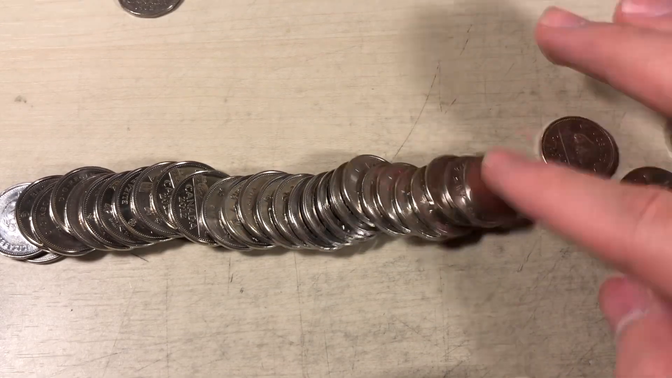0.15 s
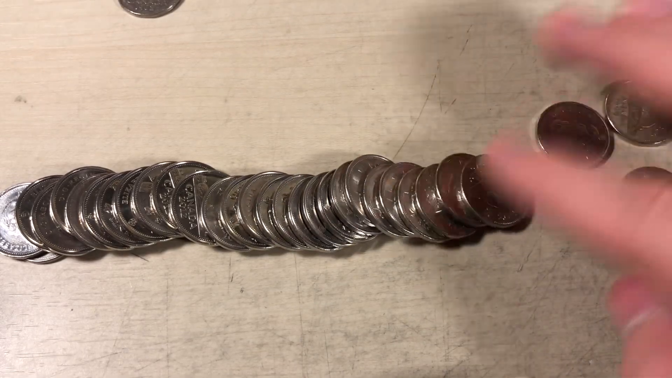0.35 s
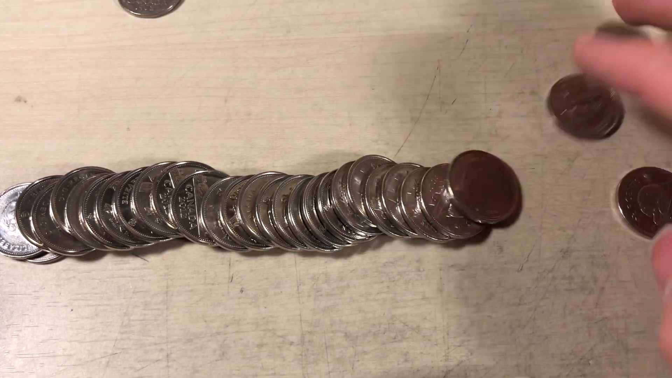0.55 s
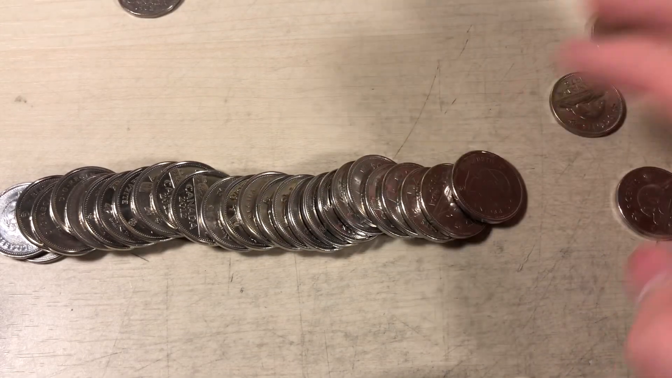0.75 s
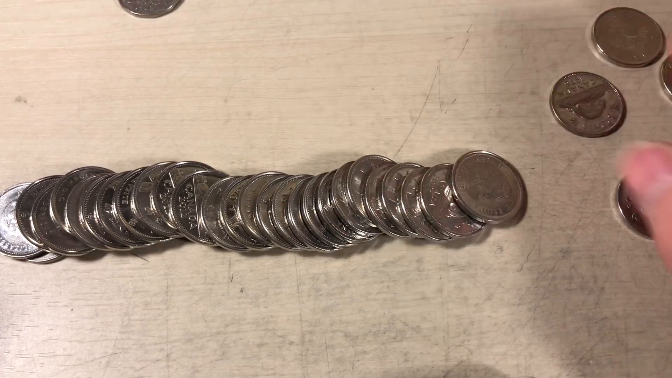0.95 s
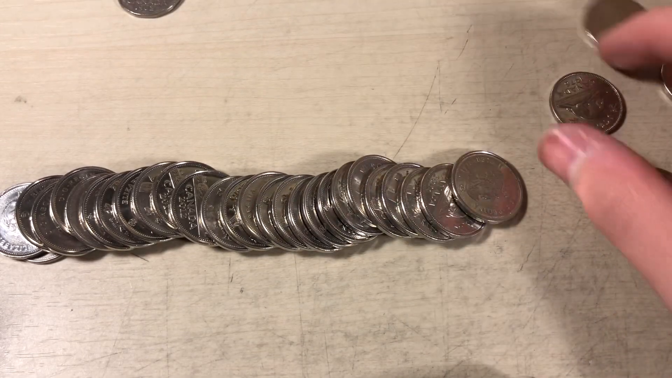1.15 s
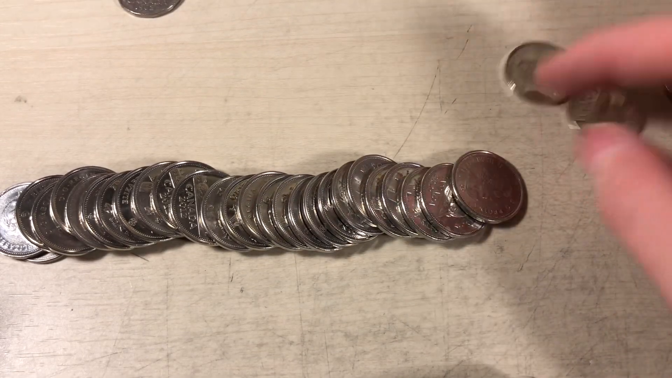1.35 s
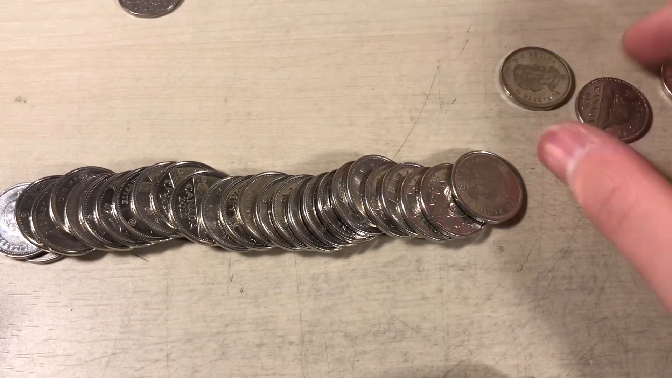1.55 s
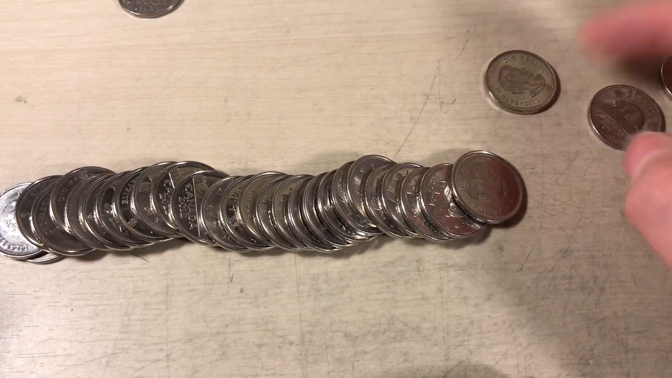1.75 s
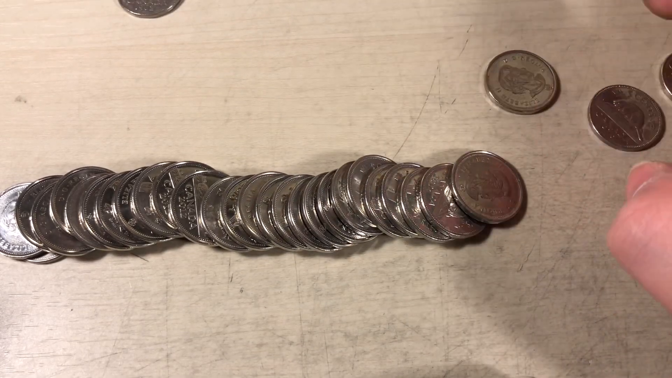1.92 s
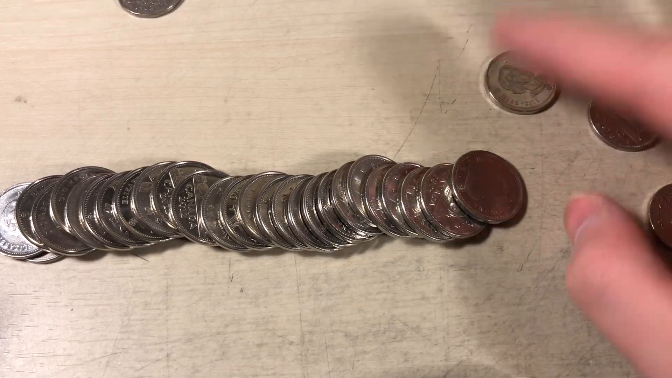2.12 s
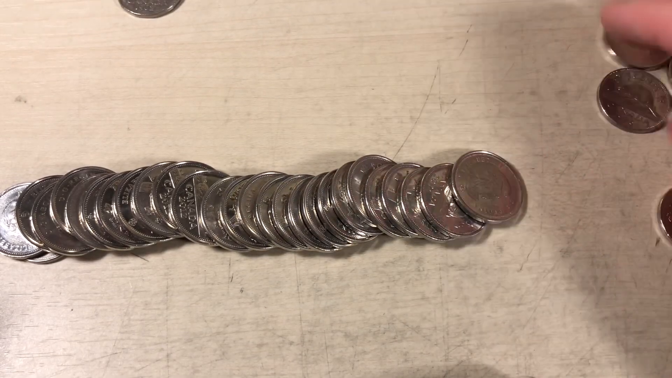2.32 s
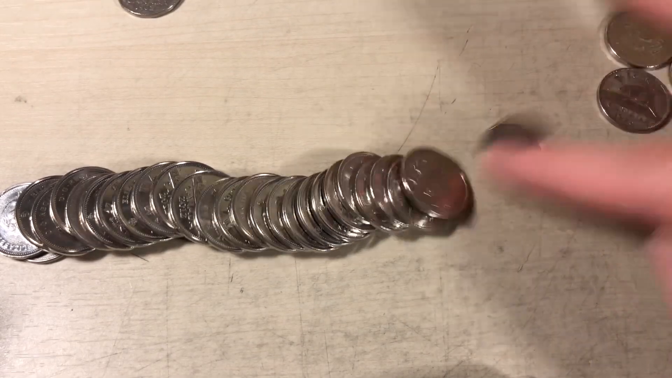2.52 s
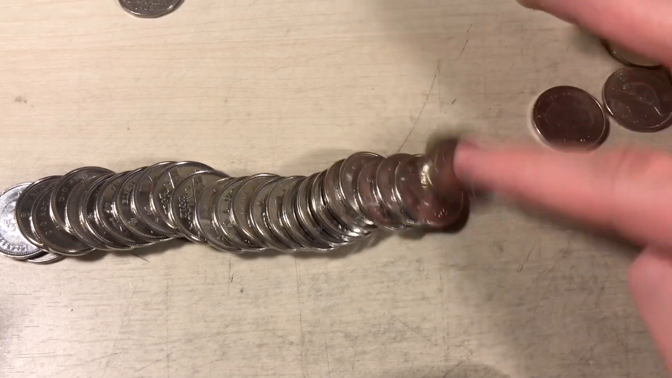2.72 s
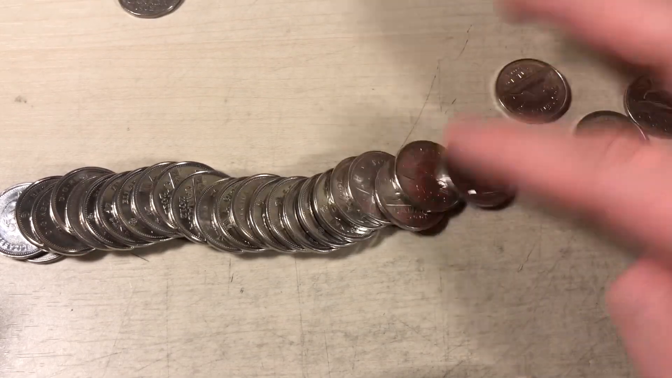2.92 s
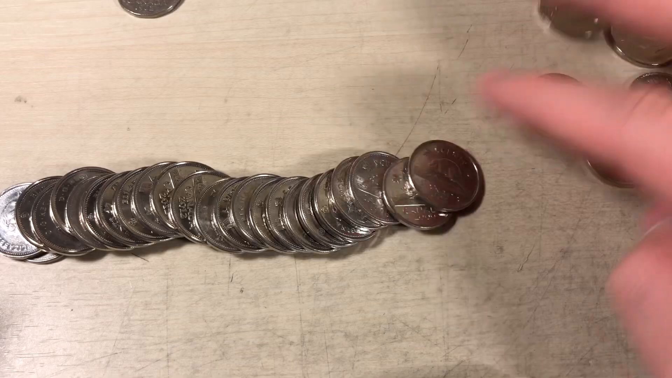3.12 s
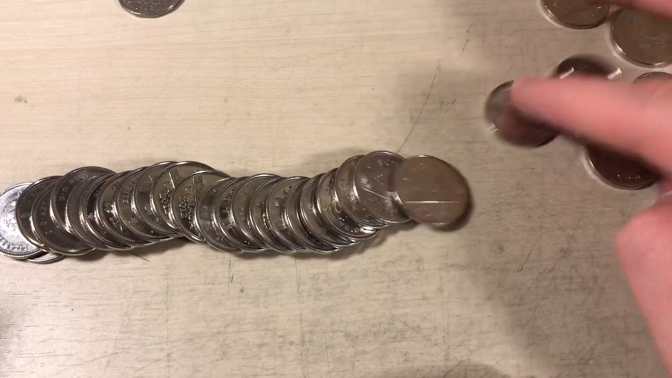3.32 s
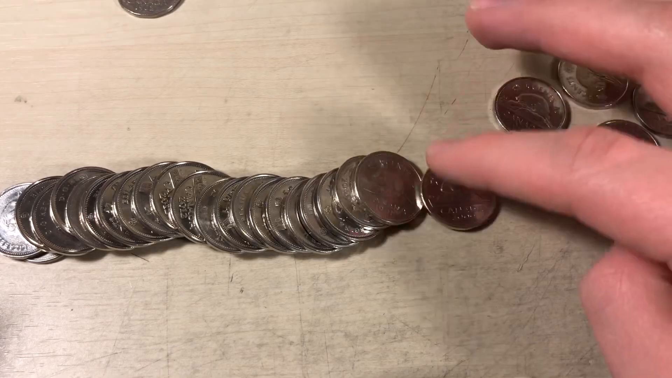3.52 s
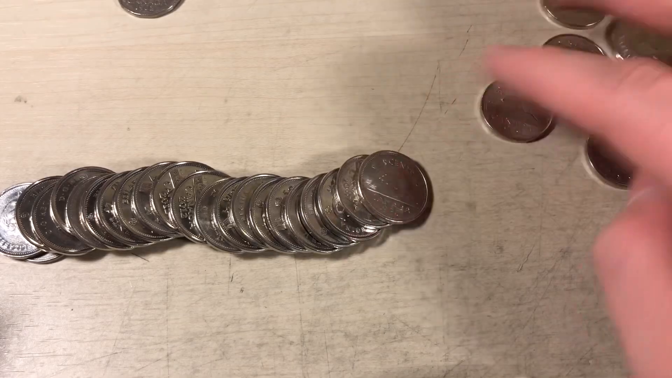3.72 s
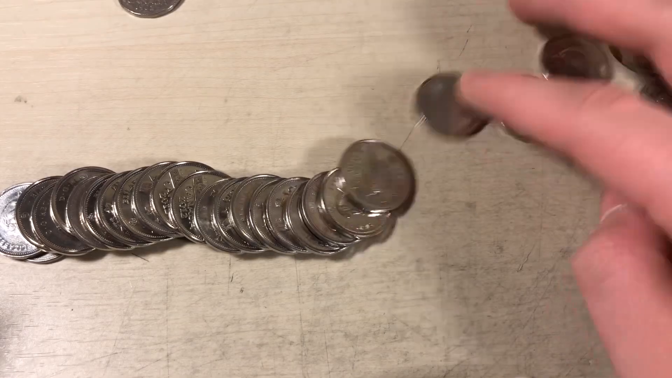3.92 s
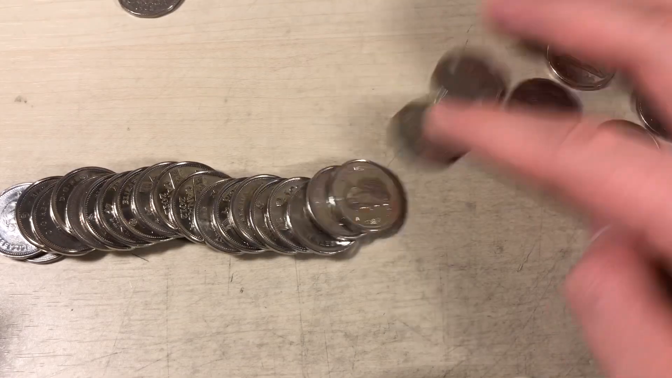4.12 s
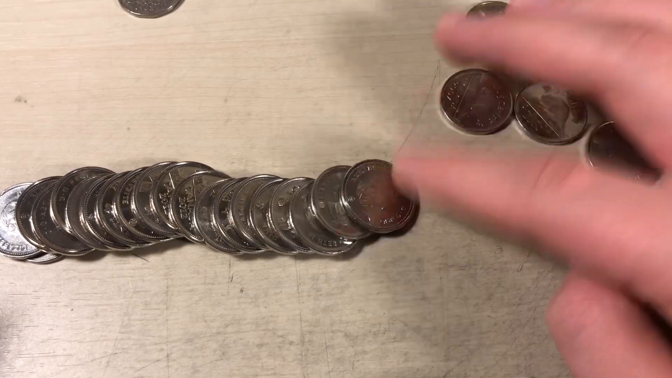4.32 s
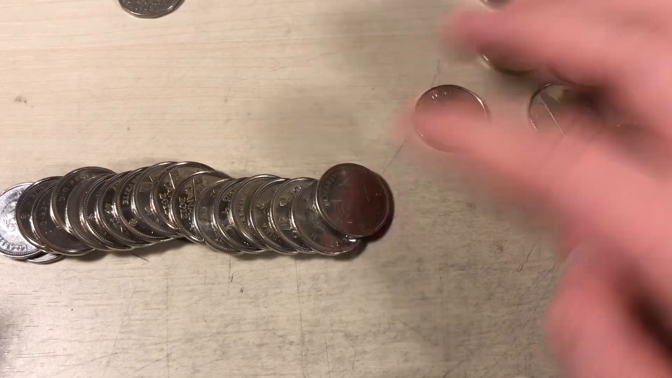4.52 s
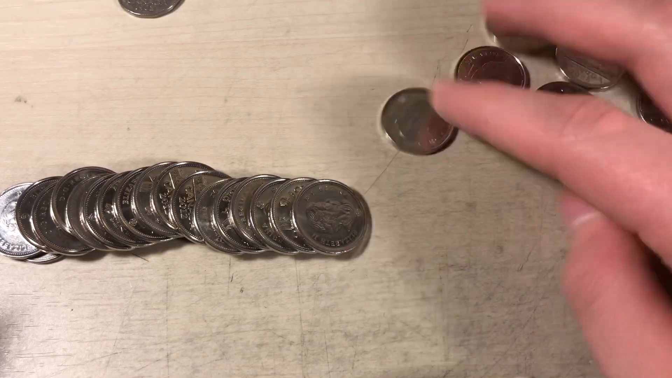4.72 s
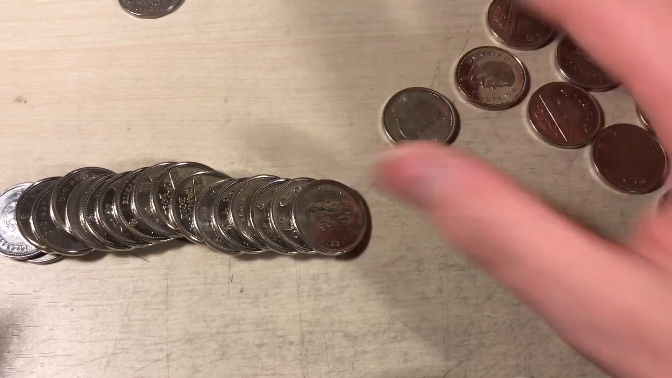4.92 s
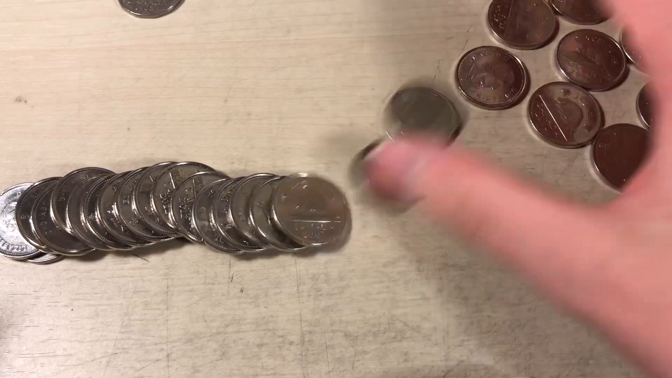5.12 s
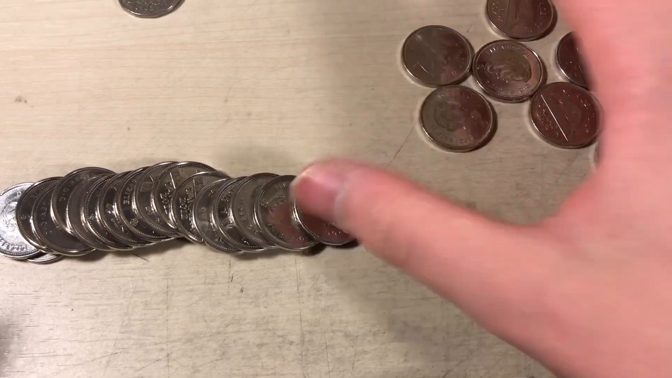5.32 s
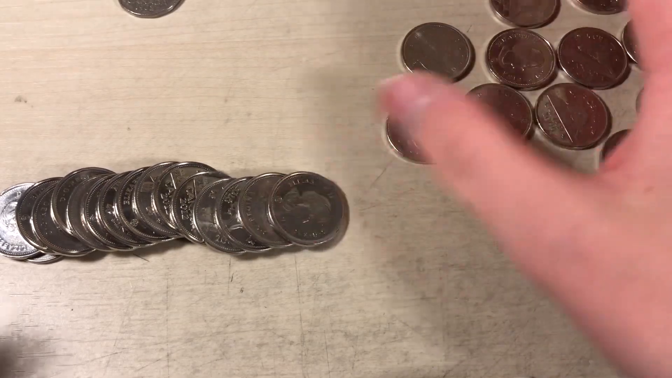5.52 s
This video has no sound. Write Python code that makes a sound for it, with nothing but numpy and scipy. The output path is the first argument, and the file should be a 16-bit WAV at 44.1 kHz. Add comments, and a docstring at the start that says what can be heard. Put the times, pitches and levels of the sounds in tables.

```python
"""Small coins are flicked one by one off a leaning row and slide across a wooden table, close to a camera.
Each coin is lumpy noise for its scrape and rim chatter, and bursts of noise and ringing modes for its clinks.
The table top knocks and shakes as a set of damped modes; now and then a fingertip taps it or skin brushes it.
A small room answers with short tails of noise, over a steady hush of air and microphone hiss."""
import sys
import numpy as np
from scipy import signal
from scipy.fft import rfft, irfft, next_fast_len
from scipy.io import wavfile
from scipy.ndimage import map_coordinates

SR = 44100
rng = np.random.default_rng(int(sys.argv[2]) if len(sys.argv) > 2 else 0)


def magnitude_from_level(level_db):
    """Linear magnitude for a level in decibels (20 dB per decade)."""
    exponent = np.asarray(level_db, float) / 20
    return 10 ** exponent


def to_wav(s):
    """Save 16-bit WAV."""
    ch = np.atleast_2d(s).T  # columns
    pcm = np.round(np.clip(ch, -1, 1) * 32767)  # PCM
    wavfile.write(sys.argv[1], SR, pcm.astype(np.int16))


N = 245195


def unit(x):
    """Scale to rms 1."""
    return x / np.sqrt(np.mean(x ** 2) + 1e-20)


def along(points, hz):
    """Interpolate (Hz, value) points on a log frequency axis."""
    f, v = np.transpose(points)
    return np.interp(np.log(hz + 1), np.log(f + 1), v)


def filtered(x, response):
    """x times a complex response of frequency."""
    m = next_fast_len(len(x) + 8192)
    return irfft(rfft(x, m) * response(np.fft.rfftfreq(m, 1 / SR)), m)[:len(x)]


def coloured(x, spectrum):
    """Causal colouring: the minimum-phase filter with this spectrum, at unit energy."""
    cepstrum = irfft(np.log(magnitude_from_level(along(spectrum, np.fft.rfftfreq(2048, 1 / SR)))))
    # folding the cepstrum onto positive time makes the filter minimum-phase
    cepstrum[1:1024] *= 2
    cepstrum[1025:] = 0
    kernel = irfft(np.exp(rfft(cepstrum)))
    return signal.fftconvolve(x, kernel / np.linalg.norm(kernel))[:len(x)]


def resonant(x, peaks):
    """x through a set of damped resonances, summed with alternating signs."""
    def response(f):
        total = 0
        for k, (hz, width, db) in enumerate(peaks):
            damping = 1j * f * width
            total = total + (-1) ** k * magnitude_from_level(db) * damping / (hz * hz - f * f + damping)
        return total
    return filtered(x, response)


def wobble(rate):
    """A smooth random curve, rate knots a second."""
    knots = rng.standard_normal(int(N * rate / SR) + 4)
    return map_coordinates(knots, [np.arange(N) * rate / SR])


def grit(rate, spread_db, ms):
    """Noise of rms 1 in lumps: rate random bumps a second, a few large, each dying in ms."""
    bumps = (rng.random(N) < rate / SR) * magnitude_from_level(spread_db * rng.exponential(size=N))
    lumps = signal.lfilter([1], [1, -np.exp(-1000 / (ms * SR))], bumps)
    return unit(lumps * rng.standard_normal(N))


# Tone of the quiet bed. Each row: frequency in Hz, relative level per Hz in dB.
HUSH_TONE = [(13, -30), (22, -11.5), (48, -3), (90, -8.5), (128, -5), (200, -13.5), (328, -12), (1130, -27),
             (14700, -37.5), (16000, -50.5)]


def hush():
    """The steady air of the room and the microphone's hiss: shaped noise."""
    return magnitude_from_level(-67.5) * unit(filtered(rng.standard_normal(N), lambda hz: magnitude_from_level(along(HUSH_TONE, hz))))


def strokes(rows, t):
    """Gain of strokes that close contact in 14 ms, climb to a peak and die away ever faster."""
    s, rise, fade, first_db, peak_db = np.transpose(rows)[:, :, None]
    ms = (t - s) * 1000
    climb_db = (peak_db - first_db) * np.clip(ms / rise, 0, 1)
    fade_db = 30 * (np.maximum(ms - rise, 0) / fade) ** 1.2  # the power steepens the fade
    return np.sum(magnitude_from_level(first_db + climb_db - fade_db) * np.clip(ms / 14, 0, 1), axis=0)


# A coin drawn off the row scrapes ever harder, drops and slows. Each row: touch in seconds,
# ride in ms, time to fade by 30 dB in ms, first touch in dB, scrape at the drop in dB.
FLICKS = [(0.002, 56, 142, -33, -30.5), (0.245, 77, 121, -37, -33.5), (0.49, 63, 138, -52, -27),
          (2.561, 26, 185.5, -16.5, -34.5), (2.816, 41, 214, -40, -31), (3.04, 51, 104, -49.5, -31.5),
          (3.305, 47, 164, -34.5, -32), (3.66, 16, 169, -55, -32), (3.906, 57, 145, -40, -32.5),
          (4.178, 45, 122.5, -26.5, -35.5), (4.45, 45, 130, -38.5, -32), (4.69, 42, 110.5, -59.5, -37.5),
          (5.135, 61, 164.5, -66.5, -31.5), (5.445, 49, 111.5, -54.5, -33.5)]
# Its milled rim chatters over the neighbours. Each row: start in seconds, build-up in ms,
# time to fade by 30 dB in ms, relative first touch in dB, relative peak in dB.
CHATTERS = [(0.004, 58, 94, -35.5, -27.5), (0.246, 114, 67, -35.5, -34), (0.49, 59, 101, -56, -29.5),
            (2.561, 36, 89, -25, -27.5), (2.816, 112, 104, -32.5, -30.5), (3.03, 53, 106, -48, -30.5),
            (3.305, 56, 140, -30, -30), (3.665, 51, 74, -47, -32.5), (3.906, 42, 138.5, -36, -27),
            (4.179, 40, 59, -25.5, -26.5), (4.445, 56, 92.5, -46.5, -38.5), (4.7, 67, 60, -42, -46),
            (5.15, 55.6, 86.5, -60, -28.5), (5.447, 34, 137.5, -63.5, -30.5)]
# A coin glides or is pushed flat over the wood. Each row: start in seconds, time to reach speed in ms,
# length to the middle of its stop in ms, scrape in dB.
GLIDES = [(0.611, 48, 77, -51), (1.214, 16, 340, -48), (1.68, 55, 152, -51.5), (2.233, 48.5, 169, -39),
          (3.13, 40, 141, -50), (3.76, 19, 87, -50), (4.78, 10, 91, -50)]


def contact_db(t):
    """Levels of the scrape on the wood and of the chatter of coin on coin at times t."""
    stop_ms, glide_chatter_db = 97, -26  # a gliding rim chatters this far under its scrape
    s, rise, length, db = np.transpose(GLIDES)[:, :, None]
    ms = (t - s) * 1000
    speed = np.clip(ms / rise, 0, 1) * np.clip((length - ms) / stop_ms + .5, 0, 1)
    glide = np.sum(magnitude_from_level(db) * speed ** 2, axis=0)
    wood = strokes(FLICKS, t) + glide
    rim = strokes(CHATTERS, t) + magnitude_from_level(glide_chatter_db) * glide
    return 20 * np.log10([wood + 1e-5, rim + 1e-5])


# Modes of a coin lying on wood. Each row: frequency in Hz, width in Hz, relative level in dB.
COIN_ON_WOOD = [(1273, 23, -15), (1766, 18, -11), (1939, 37, -8.5), (2483, 29, -4.5), (2863, 23, -4),
                (3158, 53, 1), (3725, 99, 1), (4260, 130, -2.5), (5430, 80, -19), (5870, 73, -7),
                (5960, 200, -15), (8080, 150, -10.5)]


def grounded(x, rate, depth_db):
    """The coin-on-wood resonances come and go in groups, a little detuned, as coins and places change."""
    out = np.zeros(N)
    for tune in (.972, 1, 1.028):
        for k in range(4):
            modes = [(hz * tune, width, db) for hz, width, db in COIN_ON_WOOD[k::4]]
            out += resonant(magnitude_from_level(depth_db * wobble(rate)) * x, modes)
    return out


# Modes of the table top. Each row: frequency in Hz, width in Hz, relative level in dB.
TABLE_MODES = [(190.6, 32.5, -4), (250, 70, -2.5), (322.3, 87, -5.5), (415.7, 50, -7.5), (530.7, 36, 0.5),
               (586, 25, -3.5), (651, 33, -6.5), (1015, 60, -11)]


def table(x):
    """The low and the woody modes of the top trade places as the point of contact moves."""
    groups = (TABLE_MODES[:3], TABLE_MODES[3:])
    return sum(resonant(magnitude_from_level(2.5 * wobble(5)) * x, group) for group in groups)


# Bending modes of a free coin. Each row: frequency in Hz, relative level in dB, 60 dB decay in seconds.
COIN_MODES = [(12500, -6, 0.025), (15680, 3.5, 0.032), (15560, -6, .03), (16250, 1, 0.075)]


def ring(t, spread_db):
    """A coin's bending modes; every contact rings them at slightly different pitches and levels."""
    hz, db, t60 = np.transpose(COIN_MODES)[:, :, None]
    draw = rng.standard_normal((2, len(COIN_MODES), 1))
    fade = magnitude_from_level(db + spread_db * draw[0] - 60 * t / t60)
    tuned_hz = hz * (1 + 0.0018 * draw[1])
    return np.sum(fade * np.sin(2 * np.pi * tuned_hz * t), axis=0)


# Tone of coin rasping on wood. Each row: frequency in Hz, relative level per Hz in dB.
RASP_TONE = [(410, -42.5), (700, -5.5), (886, -10.5), (1310, 0), (2160, -1.5), (4490, -4), (5400, -14),
             (6500, -12.5), (9000, -27.5), (16000, -36)]
# Tone of bright metal ticks. Each row: frequency in Hz, relative level per Hz in dB.
TICK_TONE = [(1500, -30.5), (4000, 7.5), (8000, 7), (12000, -1), (16500, -2)]
# Each kind of rim tooth ticks in its own register.
# Each row: frequency in Hz, width in Hz, relative level in dB.
RIM_TEETH = [(5500, 1200, -19), (9000, 1700, 3.5), (11700, 1500, 12.5), (14700, 3000, 0)]


def sliding():
    """Wood grain rasps the coin; milled rims chatter and keep the coin ringing; the drag shakes the table."""
    t = np.arange(N) / SR
    wood_db, rim_db = contact_db(t)

    rasp = coloured(grit(rate=1900, spread_db=2.2, ms=.9), RASP_TONE)
    body = unit(grounded(rasp, 6, 3.5))
    scrape = unit(magnitude_from_level(1.2 * wobble(35)) * (0.7 * rasp + 0.9 * body))

    teeth = 0
    for rim in RIM_TEETH:
        ticking = magnitude_from_level(2.5 * wobble(30)) * grit(rate=280, spread_db=2.4, ms=.8)
        teeth = teeth + resonant(ticking, [rim])
    # harder chatter carries more plain noise between the teeth
    fizz = .4 * magnitude_from_level(.3 * np.minimum(rim_db + 33, 0)) * rng.standard_normal(N)
    chatter = magnitude_from_level(rim_db) * (unit(teeth) + fizz)

    # only a coin tossed clear of the wood rings, in fits
    free = magnitude_from_level(.7 * np.minimum(rim_db + 30, 0) + 5.5 * wobble(30))
    # decay times become resonance widths
    modes = [(hz, np.log(1000) / (np.pi * t60), db) for hz, db, t60 in COIN_MODES[1:]]
    ringing = resonant(free * chatter, modes)

    shake = unit(table(grit(rate=500, spread_db=2, ms=1.5)))
    # a coin riding over the row presses the table harder
    drag = magnitude_from_level(wood_db - 19.5) + magnitude_from_level(-22.5) * strokes(FLICKS, t) + magnitude_from_level(rim_db - 9.5)
    bright = magnitude_from_level(-2.5) * coloured(chatter, TICK_TONE)
    return magnitude_from_level(wood_db) * scrape + bright + magnitude_from_level(12.5) * ringing + drag * shake


# Contacts of the coins. Each row: start in seconds, relative crack level in dB,
# relative level of bright tick and ring in dB, time to fade by 20 dB in ms (at least 1 is used).
CLINKS = [(0.0135, -13.5, -32, 0.77), (0.033, -15.5, -28, 4.1), (0.044, -10, -28, 3),
          (0.085, -4.5, -9, 8.1), (0.246, -13, -51.5, 2.45), (0.266, -25.5, -31.5, 1.4),
          (0.298, -17.5, -25.5, 11), (0.3266, -6.5, -12, 8.8), (0.3452, -15, -13, 1.9),
          (0.4921, -24, -42.5, 6.1), (0.5683, -13.5, -17.5, 32), (0.5761, -17, -16.5, 4.1),
          (0.5907, -12, -30, 7.8), (0.632, -23.5, -43, 8.4), (1.3076, -34, -67, 2.8),
          (1.354, -23.5, -64.5, 0.93), (1.403, -39.5, -37, 8), (1.677, -26.5, -58, 1.46),
          (2.348, -23.5, -31, 7.7), (2.359, -35.5, -31, 4.4), (2.4029, -29.5, -68, 7.1),
          (2.4304, -29, -41, 3.8), (2.564, -13, -13, 12.7), (2.5931, -7, -16.5, 10.5),
          (2.6017, -18, -48, 30), (2.6113, -2, -5.5, 6.9), (2.6374, -7, -20.5, 6.8), (2.668, -18, -35, 3.6),
          (2.69, -19, -28, 2.8), (2.717, -49, -45, 3), (2.773, -53, -55.5, 4.7), (2.8172, -26, -58, 0.86),
          (2.8586, -2.5, -15.5, 13.5), (2.876, -17, -23, 4.8), (2.887, -12.5, -24, 3.8),
          (2.9005, -7.5, -13.5, 5.8), (2.9229, -19, -20, 1), (2.9278, -12, -24, 3.9),
          (2.978, -21, -37, 1.5), (3.055, -34, -51.5, 5.4), (3.0731, -28, -23.5, 7.2),
          (3.097, -2.5, -6, 11.2), (3.3084, -10.5, -24, 0.97), (3.366, -3, -6.5, 5.3),
          (3.3714, -7.5, -12, 3.3), (3.3876, -11.5, -19, 3.2), (3.419, -19.5, -38.5, 4.8),
          (3.4479, -13, -53.5, 3.3), (3.504, -22, -39, 4), (3.5293, -18, -32.5, 5.1), (3.5534, -16, -38, 3),
          (3.571, -23.5, -49.5, 3.4), (3.5843, -21, -47.5, 3.4), (3.605, -24, -53, 5.1),
          (3.633, -28, -47, 2.5), (3.651, -30, -58.5, 4.1), (3.6555, -27.5, -56, 6.5),
          (3.683, -4.5, -4.5, 7.9), (3.709, -53, -19, 5.1), (3.771, -15, -46.5, 2.9),
          (3.7822, -29.5, -35, 8.9), (3.9081, -15.5, -47, 1.3), (3.935, -5, -11.5, 1.4),
          (3.9877, -3, -48, 3.1), (4.0145, -9.5, -14, 3.1), (4.0335, -11, -25.5, 0.84),
          (4.0442, -11, -19, 2), (4.0696, -26.5, -55, 1.5), (4.078, -28, -38, 1.6),
          (4.092, -36, -36.5, 3.4), (4.1749, -28, -37, 9.5), (4.1803, -6.5, -33, 4.5),
          (4.195, -10, -28, 3.9), (4.2097, -6, -3, 2.1), (4.217, -5.5, -21, 6.5), (4.33, -41, -48.5, 2.3),
          (4.4351, -25.5, -51.5, 2.5), (4.45, -13, -24, 12), (4.468, -39.5, -17.5, 2), (4.483, -18, -20, 4),
          (4.51, -5, -20.5, 6.7), (4.532, -17, -42, 2.6), (4.595, -26.5, -50, 1.4), (4.753, -8.5, -5, 6),
          (4.7766, -18.5, -15, 7.6), (4.814, -27.5, -36, 5.9), (5.128, -18.5, -22, 5.8),
          (5.159, -24, -20, 1.9), (5.205, -16.5, -15, 12), (5.2197, -4.5, -3.5, 7.7), (5.241, -9, -28, 4),
          (5.249, -20.5, -21.5, 7), (5.354, -48, -50, 4.5), (5.5007, -11, -6.5, 15),
          (5.529, -7.5, -11, 2.6), (5.544, -15, -17, 2.9)]
# Tone of the crack. Each row: frequency in Hz, relative level per Hz in dB.
CRACK_TONE = [(300, -28.5), (900, -8), (2000, -4), (3800, 3), (5500, -8.5), (7500, -7.5), (10000, -8),
              (13000, -5.5), (16500, -10.5)]
# A light graze of two rims ticks only in the treble.
# Each row: frequency in Hz, width in Hz, relative level in dB.
GRAZE_MODES = [(11000, 8100, 2.5)]


def clinks():
    """Each contact is a burst of tiny edge impacts, a table knock, and a bright tick that rings the coin."""
    crack, knock, tick, bell, after, graze = np.zeros((6, N + SR))
    t = np.arange(SR // 10) / SR
    for s, crack_db, ring_db, ms in CLINKS:
        at = slice(round(s * SR), round(s * SR) + len(t))
        fade = magnitude_from_level(-20 * t / (max(ms, 1) / 1000)) * (1 - np.exp(-t / 0.00055))
        lumps = magnitude_from_level(4 * rng.standard_normal(len(t) // 30).repeat(30))
        impacts = rng.standard_normal((3, len(t))) * lumps
        crack[at] += magnitude_from_level(crack_db - 6.5) * fade * impacts[0]
        # the coin shudders dully after each contact, falling 20 dB in 14 ms
        after[at] += magnitude_from_level(crack_db - 25.5 - 20 * t / 0.014) * impacts[2]
        light = np.clip((-14 - ring_db) / 14, 0, 1)  # 0 a full tick, 1 only a graze
        tick[at] += (1 - light) * magnitude_from_level(ring_db - 3.5) * fade * impacts[1]
        graze[at] += light * magnitude_from_level(ring_db) * fade * impacts[1]
        knock[at] += magnitude_from_level(crack_db - 1.0) * np.exp(-t / 0.00039)
        # a coin still chattering 12 ms later is clear of the wood and rings
        tossed_db = contact_db(np.array([s + .012]))[1, 0]
        bell_db = 0.35 * ring_db + 0.93 * tossed_db + 12.5
        bell[at] += magnitude_from_level(bell_db) * ring(t, spread_db=5) * (1 - np.exp(-t / 0.0017))
    crack = coloured(crack[:N], CRACK_TONE)
    crack = .75 * crack + .6 * grounded(crack, 25, 6)  # every blow finds its own mix of modes
    dull = coloured(after[:N], RASP_TONE) + crack + table(knock[:N])
    bright = coloured(tick[:N], TICK_TONE) + resonant(graze[:N], GRAZE_MODES) + bell[:N]
    return dull + bright


# Decay of the room. Each row: frequency in Hz, 60 dB decay in seconds.
ROOM_DECAY = [(200, 0.29), (1000, 0.29), (3000, 0.13), (8000, 0.058), (15000, 0.05)]


def room(x):
    """Each frequency of the room's answer dies at its own speed; a new tail every 50 ms as things move."""
    out, hop, delay = np.zeros(N + SR), SR // 20, 130  # samples
    for at in range(0, N, hop):
        hz, t, z = signal.stft(rng.standard_normal(SR // 3), SR, nperseg=256)
        fade = magnitude_from_level(-60 * t / along(ROOM_DECAY, hz)[:, None])
        tail = signal.istft(z * fade, SR, nperseg=256)[1]
        wet = signal.fftconvolve(x[at:at + hop], tail / np.linalg.norm(tail))
        out[at + delay:at + delay + len(wet)] += wet
    return out[:N]


# Skin brushing the wood. Each row: start in seconds, end in seconds, level in dB.
BRUSHES = [(1.127, 1.32, -67.5), (4.918, 5.128, -62)]
# Tone of skin on wood. Each row: frequency in Hz, relative level per Hz in dB.
SKIN_TONE = [(1500, -7), (4000, -1.5), (6500, 2.5), (11000, -8), (16000, -13)]


def brush():
    """A thumb passing lightly over the table hisses softly: noise under a rounded swell."""
    t = np.arange(N) / SR
    swell = 0
    for start, end, db in BRUSHES:
        progress = np.clip((t - start) / (end - start), 0, 1)
        swell = swell + magnitude_from_level(db) * np.sin(np.pi * progress) ** 0.51
    return swell * coloured(rng.standard_normal(N), SKIN_TONE)


# A fingertip lands on the table. Each row: start in seconds, relative level in dB.
TAPS = [(1.228, -36), (1.677, -30), (2.331, -35)]


def taps():
    """A soft fingertip gives one slow, low push of 2.7 ms to the table's lowest modes."""
    push, t = np.zeros(N), np.arange(SR // 100) / SR
    for s, db in TAPS:
        push[round(s * SR):][:len(t)] += magnitude_from_level(db + 15.0) * np.sin(np.pi * np.minimum(t / 0.0027, 1)) ** 2
    return resonant(push, TABLE_MODES[:4])


def scene():
    """Coins and fingers, their room, and the hush; the table top is too small to radiate deep bass."""
    dry_mix = clinks() + sliding() + taps() + brush()
    near = filtered(dry_mix, lambda hz: (1j * hz / (1j * hz + 70)) ** 2)
    return (near + magnitude_from_level(-11.5) * room(near) + hush())[None]


def top_cut(x):
    """Nothing passes above the cut-off."""
    return signal.sosfilt(signal.butter(12, 17000, fs=SR, output="sos"), x)


def record(dry):
    """Tall peaks are rounded off; little is left below the bass or above about 15.8 kHz."""
    soft = dry[0] / (1 + np.abs(dry[0] / .95) ** 4) ** (1 / 4)

    def band(hz):
        treble = magnitude_from_level(-32) + .5 - .5 * np.tanh((hz - 15830) / 45)
        bass = hz ** 4 / (hz ** 4 + 33 ** 4)
        return treble * bass

    mix = filtered(soft, band)[None]
    return top_cut(mix)


dry = scene()
out = record(dry)
to_wav(out)
```